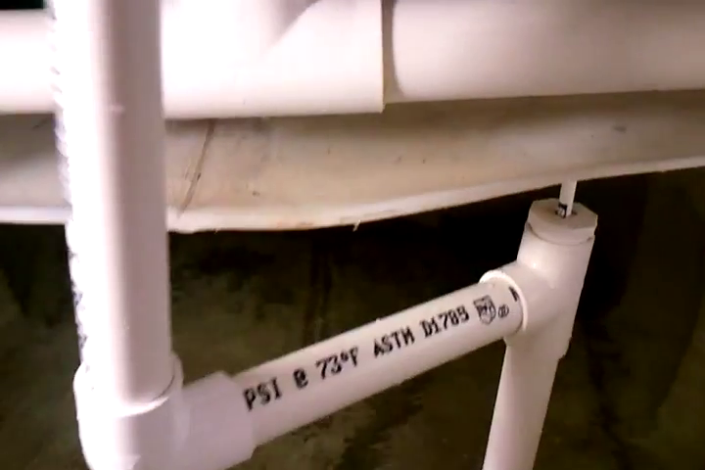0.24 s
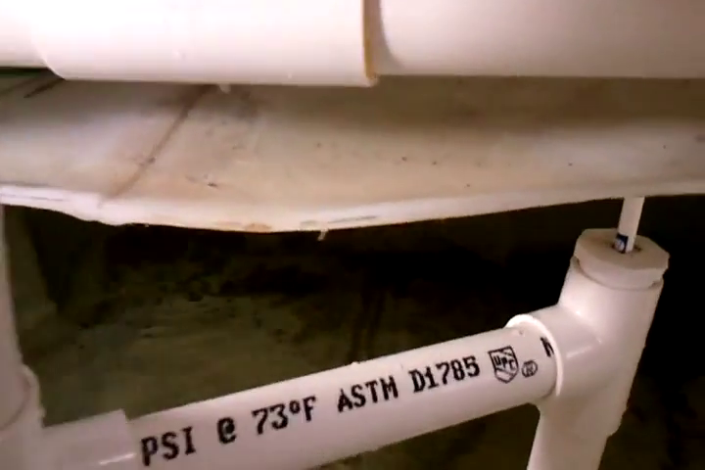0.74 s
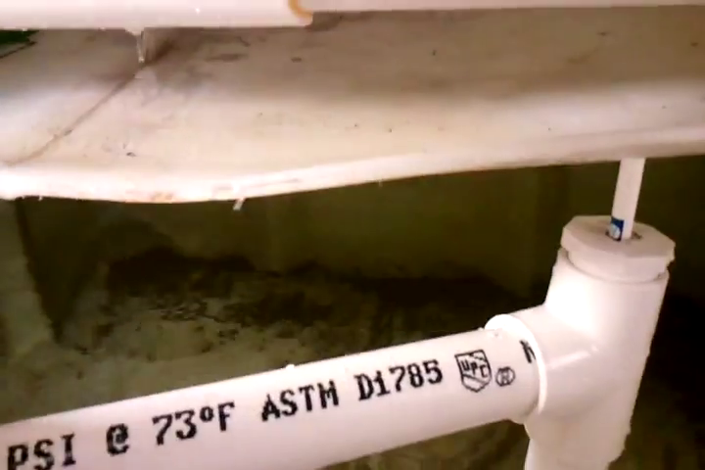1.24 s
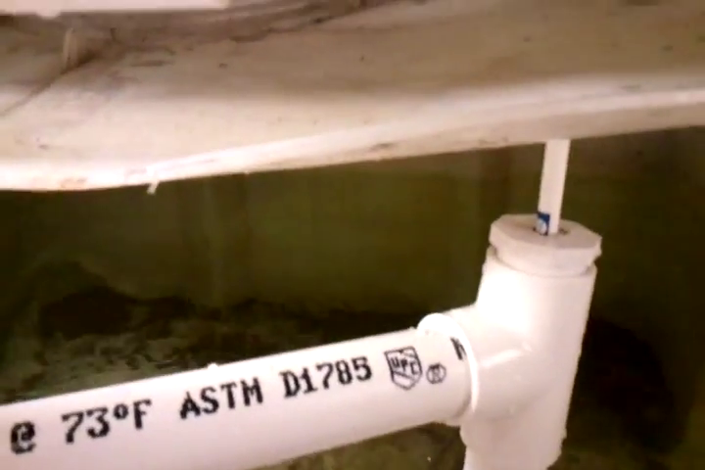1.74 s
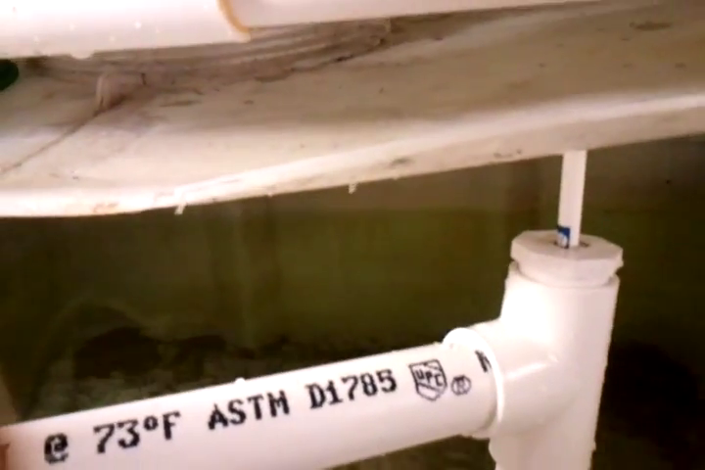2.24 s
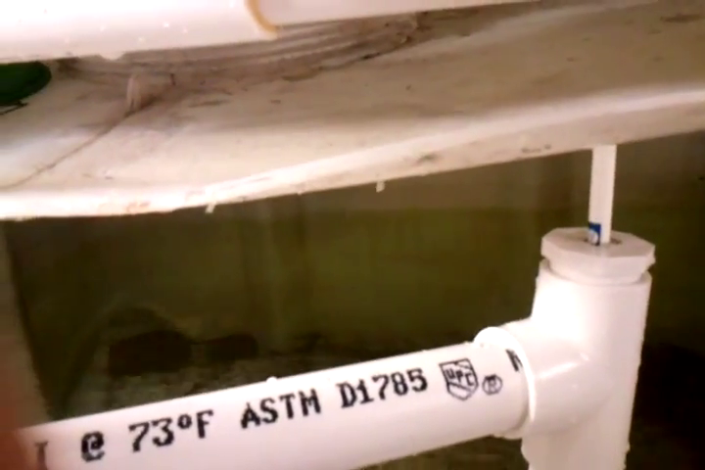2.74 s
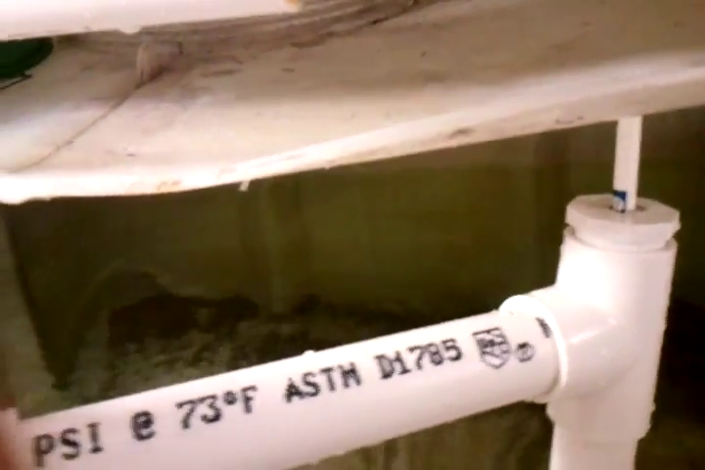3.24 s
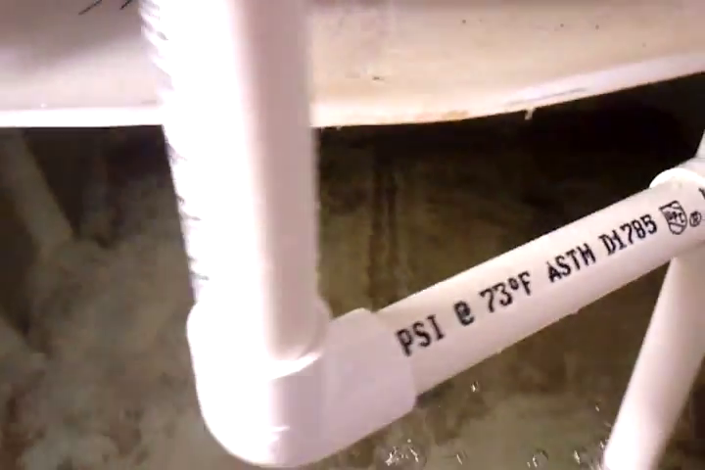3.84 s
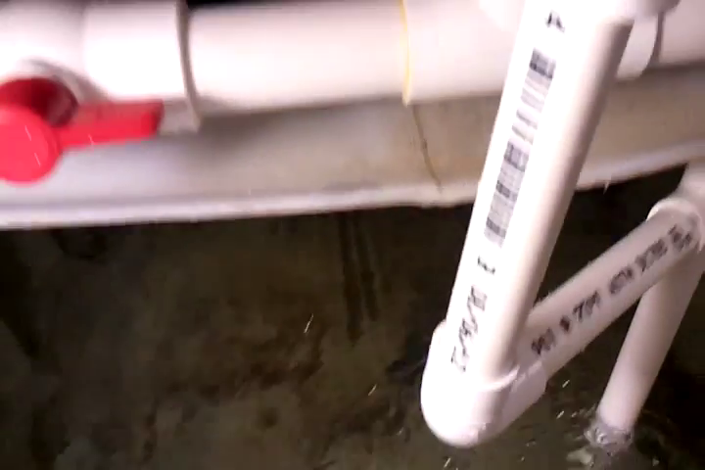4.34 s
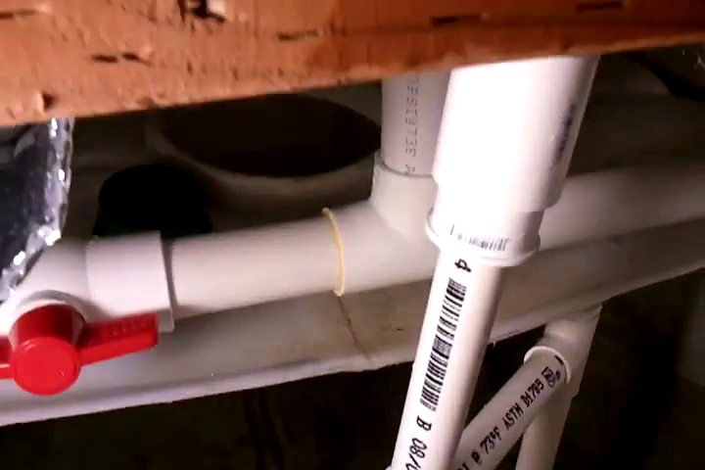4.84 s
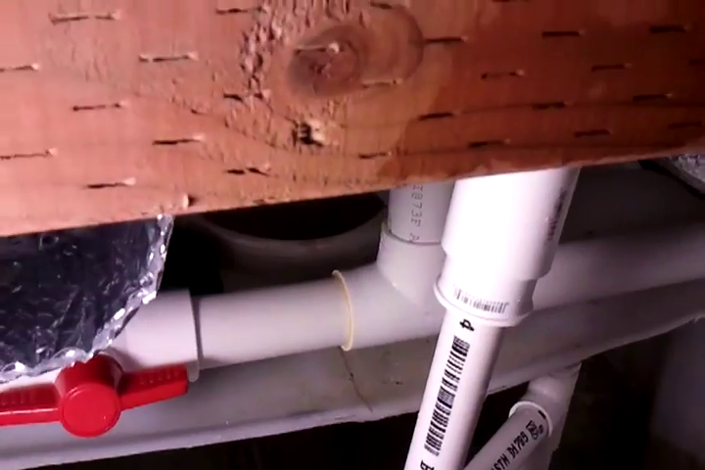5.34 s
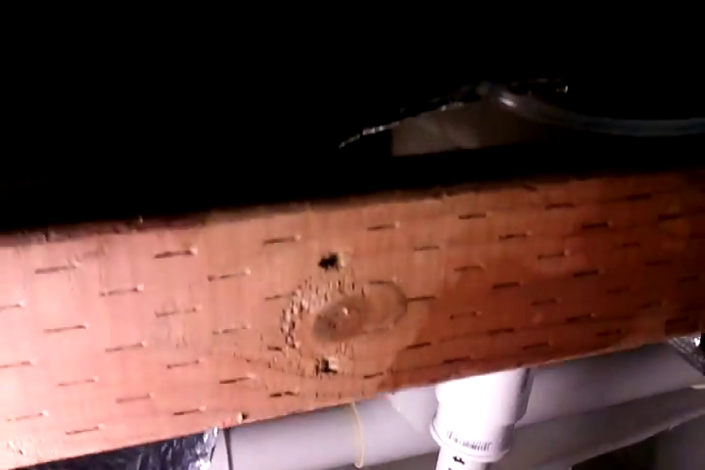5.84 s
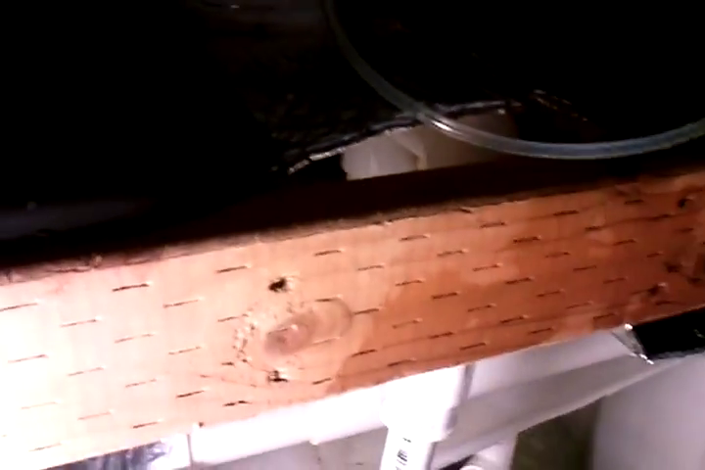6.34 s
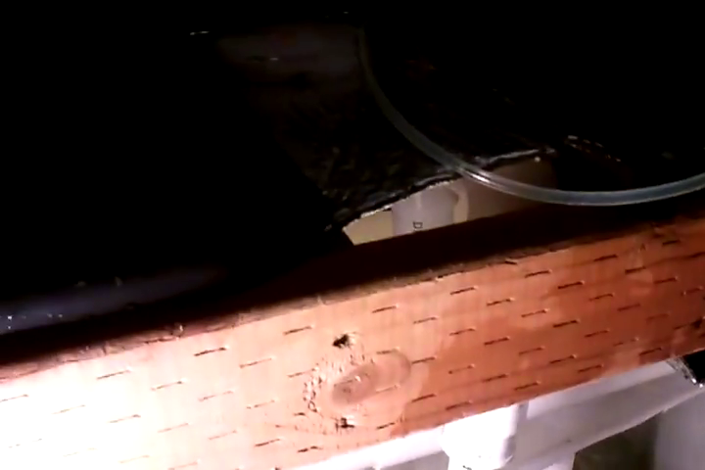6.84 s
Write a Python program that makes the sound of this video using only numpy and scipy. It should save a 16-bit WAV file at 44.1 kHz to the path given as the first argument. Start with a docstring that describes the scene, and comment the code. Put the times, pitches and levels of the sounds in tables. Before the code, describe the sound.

Water pours from a plastic pipe into a part-filled tank, spattering and burbling unevenly, interrupted early by one juddering finger bump.

```python
"""A water jet from a plastic pipe plunges into a part-filled tank: spatter, burble and gurgle.
Each band mixes random drop impacts, a bubble swarm and slaps of big lumps, rung through the tank.
A few loud bubbles plink. A finger bumps the microphone early on and briefly shuts its port.
Later the camera draws back from the opening; its recorder clips and has a narrow band."""
import sys
import numpy as np
from scipy import signal
from scipy.io import wavfile
from scipy.ndimage import map_coordinates

SR = 44100
rng = np.random.default_rng(int(sys.argv[2]) if len(sys.argv) > 2 else 0)


def to_wav(s):
    """Save 16-bit WAV."""
    ch = np.atleast_2d(s).T  # columns
    pcm = np.round(np.clip(ch, -1, 1) * 32767)  # PCM
    wavfile.write(sys.argv[1], SR, pcm.astype(np.int16))


N = 312669
TIME = np.arange(N) / SR
# band edges gurgle/burble and burble/spatter [f/Hz]
SPLIT_HZ = 1300, 2800


def gain_of(db):
    """Decibels to amplitude."""
    return 10 ** (np.asarray(db) / 20)


def evened(x):
    """Scales to rms 1."""
    return x / np.sqrt(np.mean(x ** 2) + 1e-20)


def curve(rows, t, axis=1):
    """One table column, linear in time."""
    rows = np.array(rows)
    return np.interp(t, rows[:, 0], rows[:, axis])


def read(rows, hz, axis=1):
    """One table column, linear in log frequency."""
    rows = np.array(rows)
    return np.interp(np.log(hz + 1), np.log(rows[:, 0]), rows[:, axis])


def add(mix, s, sound):
    """Mixes a sound in at time s, in place."""
    part = mix[max(round(s * SR), 0):][:len(sound)]
    part += sound[:len(part)]


def through(x, response):
    """Convolves and keeps the length."""
    return signal.oaconvolve(x, response)[:len(x)]


def smooth_noise(place):
    """Smooth noise, rms about 1: one random knot per unit of place."""
    knots = rng.standard_normal(4096)
    return map_coordinates(knots, [place], order=3, mode="wrap")


def impacts(rate, spread_db):
    """Random clicks of either sign, rate per second; levels exponentially spread in dB."""
    size = gain_of(spread_db * np.minimum(rng.exponential(1, N), 4))
    sign = rng.choice([-1., 1.], N)
    return size * sign * (rng.random(N) < rate / SR)


def bubble(hz, cycles, rise):
    """A trapped bubble decays by 1/e in so many cycles; pitch rises as it nears the surface."""
    age = np.arange(int(5 * cycles / hz * SR)) * hz / cycles / SR  # in decay times
    phase = 2 * np.pi * cycles * age * (1 + rise * age / 2)
    return np.exp(-age) * np.sin(phase)


def bubbles(low_hz, high_hz, rate, cycles, rise, spread_db, count=24):
    """A swarm of bubbles of many sizes: random births, log-spaced detuned pitches, rms 1."""
    births = impacts(rate, spread_db)
    kind = rng.integers(0, count, N)
    pitches = np.geomspace(low_hz, high_hz, count)
    step = np.log(high_hz / low_hz) / count
    detune = np.exp(rng.uniform(-0.29, 0.4, N) * step)
    out = np.zeros(N)
    for i in np.flatnonzero(births):
        hz = pitches[kind[i]] * detune[i]
        add(out, i / SR, births[i] * hz * bubble(hz, cycles, rise))
    return evened(out)


# echo decay in the tank [f/Hz, T60/s]
ECHO_T60 = [(200, 0.09), (800, 0.075), (2200, 0.05), (5000, 0.18), (8000, 0.062)]


def walls(x, wet_db, count=10):
    """Dense reflections from the tank walls; the heaving surface keeps changing them."""
    t = np.arange(SR // 4) / SR
    taps = rng.standard_normal((count, len(t))) * (t > .002)
    hz, at, z = signal.stft(taps, SR, nperseg=256)
    decay = gain_of(-60 * at / read(ECHO_T60, hz)[:, None])
    tails = signal.istft(z * decay, SR)[1]
    turn = TIME * 30 + rng.random()  # 30 tails/s, overlapped
    echo = np.zeros(N)
    for k, tail in enumerate(tails):
        window = np.sin(np.pi / 2 * np.minimum((turn - k) % count, 2))
        echo += through(x * window, tail / np.linalg.norm(tail))
    wet = gain_of(wet_db)
    return (x + wet * echo) / np.hypot(1, wet)


# camera position [t/s, 0 at the opening to 1 drawn back]
RETREAT = [(0, 0.59), (.7, 0.12), (1.4, 0.2), (3.4, 0.0086), (4.6, 0.85), (7.09, 0.93)]


def retreat():
    """Camera position over time, 0 to 1."""
    return np.clip(curve(RETREAT, TIME), 0, 1)


# broad relative colour of the water [f/Hz, level/dB at the opening, level/dB drawn back]
COLOUR = [(30, -32, -35), (65, -24, -27), (130, -25, -28), (260, -16, -21), (430, -20, -25),
          (560, -13, -21), (860, -4, -5), (1050, -12, -11), (1750, -14, -13), (2250, -6, -3),
          (2900, -12, -13), (3600, -6.5, -5), (4050, -8, -9), (5050, -.5, .5), (6500, -9, -13.5),
          (7900, -12, -17)]
# tank resonances over it [f/Hz, width/Hz, lift/dB at the opening, lift/dB drawn back]
TANK = [(208, 42, 11.5, 9), (600, 55, 9, 7), (708, 40, 6, 5), (795, 45, 4, 1), (1235, 50, 5, 2),
        (1550, 80, 4, 2), (1955, 50, 11, 6), (2160, 55, 4, 3), (2288, 45, 10, 6), (2550, 70, 6, 1),
        (3355, 70, 7, 0), (3560, 50, 4, 7), (3735, 60, 6, 4), (4310, 60, 3, 3), (4818, 70, 6, 2),
        (4967, 55, 3, 4), (5195, 55, 5, 2), (5438, 60, 3, 4), (5565, 45, 4, 0)]


def tank(x, low_hz, high_hz):
    """Rings one band through the tank, each colour at the input's level; camera blends them."""
    hz = np.fft.rfftfreq(8192, 1 / SR) + 1
    band_db = -10 * np.log10((1 + (low_hz / hz) ** 12) * (1 + (hz / high_hz) ** 12))
    back = retreat()
    out = np.zeros(N)
    for place, share in enumerate([1 - back, back]):
        db = read(COLOUR, hz, axis=1 + place) + band_db
        for row in TANK:
            db += row[2 + place] / (1 + (2 * (hz - row[0]) / row[1]) ** 2)
        log_gain = np.log(gain_of(np.maximum(db, -90)))
        # minimum phase: each resonance rings after the blow
        mirrored = np.r_[log_gain, log_gain[-2:0:-1]]
        ring = np.fft.ifft(np.exp(np.conj(signal.hilbert(mirrored)))).real
        out += share * evened(through(x, ring[:len(hz)]))
    return out * np.std(x)


# big lumps of water [t/s, level/dB re stream before each band's follow factor, length/s]
SPLASHES = [(0.119, 14.5, 0.0074), (.169, 9, .008), (0.198, 4, .02), (0.239, 3, .05), (.466, 16.5, 0.0044),
            (0.544, 3, 0.009), (1.114, 7.5, 0.025), (1.276, 11, 0.011), (1.446, 7.5, 0.0087),
            (1.516, 8.5, 0.016), (1.641, 4.5, 0.026), (1.734, 7.5, .012), (1.875, 9, 0.02),
            (2.008, 6, 0.022), (2.059, 6.5, .035), (2.181, 1.5, 0.013), (2.269, 1, 0.038),
            (2.364, 8, 0.0079), (2.83, 2, 0.013), (2.894, 7.5, 0.013), (3.002, 5.5, 0.025),
            (3.266, 12, 0.011), (3.364, 8.5, .006), (3.378, 12, 0.0098), (3.748, 3.5, 0.015),
            (3.819, 13, 0.015), (3.883, 4, 0.0087), (4.444, 6.5, 0.0072), (4.541, 11, 0.015),
            (4.695, 10, 0.067), (6.035, 6.5, 0.015), (6.386, 8.5, 0.032), (6.449, 6.5, .012),
            (6.484, 3.5, 0.043), (6.7, 8.5, 0.014), (6.818, 11, 0.017), (6.884, 4.5, 0.007),
            (6.947, 6, 0.0085)]


def lulls(length_s):
    """How far the jet has thinned (0 to 1) just before each big lump lands."""
    thin = np.zeros(N)
    ramp = np.linspace(0, 1, round(length_s * SR))
    for row in SPLASHES:
        add(thin, row[0] - length_s, ramp)
    return np.minimum(thin, 1)


MEAN_GAP_S, SMALL_DB, SMALL_SPREAD_DB, MEAN_LENGTH_S = .055, -1.5, 3.5, 0.0027


def lumps(count=200):
    """The big lumps plus a random run of small ones: level SMALL_DB +/- SMALL_SPREAD_DB."""
    gap, size, length = 2 * rng.random((count, 3)).T  # uniform, mean 1
    times = np.cumsum(gap * MEAN_GAP_S)
    levels_db = SMALL_DB + SMALL_SPREAD_DB * (size - 1)
    return list(SPLASHES) + list(zip(times, levels_db, MEAN_LENGTH_S * length))


LAND_S, SPRAY_DECAY_S, CRACK_DECAY_S = .003, 0.012, 0.0028


def slaps(landings, follow, crack):
    """Splash strength re stream: a crack, a short pour, then dying spray; powers add."""
    power = np.zeros(N)
    t = np.arange(SR // 3) / SR
    for s, db, length in landings:
        spray = np.minimum(t / LAND_S, 1) * np.exp(-np.maximum(t - length, 0) / SPRAY_DECAY_S)
        snap = crack * np.exp(-t / CRACK_DECAY_S)
        add(power, s, (gain_of(follow * db) * (spray + snap)) ** 2)
    return np.sqrt(power)


LULL_S, LULL_DB = 0.026, -3
# moments when the jet breaks off [t/s, length/s, level/dB]
BREAKS = [(1.401, 0.059, -5.5), (1.919, 0.044, -3.5), (3.405, .11, -7.5), (4.312, 0.074, -3.5),
          (6.266, 0.05, -7)]


def jet_db():
    """Jet level: dips where it breaks off and as it thins before each big lump."""
    db = LULL_DB * lulls(LULL_S)
    for s, length, depth_db in BREAKS:
        add(db, s, depth_db * signal.windows.tukey(round(length * SR)))
    return db


# stream between splashes, before band trims [t/s, spatter level/dB, burble level/dB]
FLOW = [(0.0, -21, -27), (0.22, -19, -23.5), (0.47, -19.5, -34), (0.63, -18, -30.5), (1.3, -19.5, -24.5),
        (2.07, -19.5, -23.5), (2.78, -19, -25), (3.18, -15.5, -23.5), (3.41, -18, -23.5),
        (3.79, -21.5, -25.5), (4.23, -24, -32.5), (4.58, -27.5, -30.5), (4.88, -21, -27.5),
        (5.13, -22, -29.5), (5.71, -28, -28.5), (6.16, -25.5, -27), (6.54, -20.5, -26.5),
        (7.09, -24, -24.5)]


def flow_gain(axis):
    """Slow stream level of one band plus the jet's dips, as amplitude."""
    return gain_of(curve(FLOW, TIME, axis) + jet_db())


# finger juddering to a stop on the case [t/s, nominal judder f/Hz, push level/dB before overload]
BUMP = [(.34, 543, -4), (.344, 499, -5.5), (.356, 465, -2), (.366, 221, 2), (.38, 150, 16.5),
        (.395, 108.5, 8.5), (.413, 113, 19.5)]


def bump():
    """Judder on the case overloads the microphone; only the edges pass its bass cut."""
    t = np.arange(BUMP[0][0], BUMP[-1][0], 1 / SR)
    judder_hz = curve(BUMP, t) * np.exp(0.25 * smooth_noise(t * 300))
    turns = np.cumsum(judder_hz) / SR
    # uneven slips; roughness slows down with them
    push = np.sin(2 * np.pi * turns) + .8 * smooth_noise(3.5 * turns) + .45 * smooth_noise(10 * turns)
    jammed = np.tanh(push * gain_of(curve(BUMP, t, axis=2)))
    held = np.pad(jammed, (0, SR // 20), mode="edge")
    bass_cut = signal.butter(1, 110, "high", fs=SR, output="sos")
    edges = signal.sosfilt(bass_cut, signal.sosfilt(bass_cut, held))
    out = np.zeros(N)
    add(out, t[0], edges)
    return out


# single loud bubbles, before the echo mix [t/s, starting f/Hz, level/dB]
PLINKS = [(.285, 5240, -8.5), (1.465, 1940, -11), (2.646, 6100, -6), (2.828, 5740, -5), (4.993, 5930, -9),
          (6.27, 6170, -16)]


def plinks():
    """A few bubbles ring out above the rest and echo round the tank."""
    out = np.zeros(N)
    for s, hz, db in PLINKS:
        add(out, s, gain_of(db) * bubble(hz, cycles=12, rise=0.003))
    return walls(out, wet_db=3)


GURGLE_DB, GURGLE_RETREAT_DB = -30, -8.5


def gurgle(churn, landings):
    """Big air pockets throb under the jet; they and the thumps fade as the camera draws back."""
    push = evened(impacts(rate=2000, spread_db=3))
    pockets = bubbles(170, 1300, rate=150, cycles=5.6, rise=0.03, spread_db=-2.6)
    throb = gain_of(1.16 * churn + 0.88 * smooth_noise(TIME * 28))
    stream = evened((push + gain_of(-20) * pockets) * throb)
    thump_noise = gain_of(-3.5) * evened(impacts(rate=5000, spread_db=1.5))
    thumps = thump_noise * slaps(landings, follow=0.5, crack=0.4)
    flow = gain_of(GURGLE_DB + GURGLE_RETREAT_DB * retreat() ** 3 + jet_db())
    return tank(walls(flow * (stream + thumps), wet_db=-0.5), 40, SPLIT_HZ[0])


def burble(churn, landings):
    """The plunging jet folds in larger bubbles than the spatter's."""
    drops = evened(impacts(rate=2300, spread_db=1.5))
    blips = bubbles(1297, 2756, rate=300, cycles=14.5, rise=0.027, spread_db=-2.0)
    stream = evened((drops + gain_of(-11.5) * blips) * gain_of(0.99 * churn))
    plunge_noise = gain_of(1.5) * evened(impacts(rate=7000, spread_db=3.5))
    plunge = plunge_noise * slaps(landings, follow=0.46, crack=1.3)
    wet = walls(flow_gain(axis=2) * (stream + plunge), wet_db=-2.5)
    return gain_of(-2.5) * tank(wet, *SPLIT_HZ)


def spatter(churn, landings):
    """Drops crack on the surface and leave tiny bubbles."""
    drops = evened(impacts(rate=4500, spread_db=2.5))
    fizz = bubbles(3041, 7724, rate=600, cycles=16.8, rise=0.015, spread_db=3.0)
    stream = evened((drops + gain_of(-4) * fizz) * gain_of(0.62 * churn))
    spray_noise = evened(evened(impacts(rate=12000, spread_db=3.0)) + gain_of(-9.5) * fizz)
    spray = spray_noise * slaps(landings, follow=0.76, crack=1.36)
    wet = walls(flow_gain(axis=1) * (stream + spray), wet_db=-2.0)
    return gain_of(-3.0) * tank(wet, SPLIT_HZ[1], SR / 2)


# finger over the microphone port [t/s, water level/dB]
COVER = [(.3, 0), (.335, 0), (.37, -23), (.415, -31), (.429, -38), (.433, 1.5)]


def scene():
    """One unsteady jet drives the three water bands; the finger covers water, not its own bump."""
    churn = smooth_noise(TIME * 32) + 1.63 * smooth_noise(TIME * 130)
    landings = lumps()
    water = plinks() + gurgle(churn, landings) + burble(churn, landings) + spatter(churn, landings)
    return (bump() + water * gain_of(curve(COVER, TIME)))[None]


EDGE_HZ = 8230


def record(dry):
    """The recorder clips at full scale, then low-passes at EDGE_HZ."""
    low_pass = signal.firwin(401, EDGE_HZ, window=("kaiser", 8), fs=SR)
    return signal.oaconvolve(np.clip(dry, -1, 1), low_pass[None], "same")


dry = scene()
out = record(dry)
to_wav(out)
```